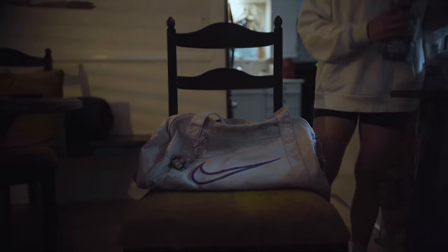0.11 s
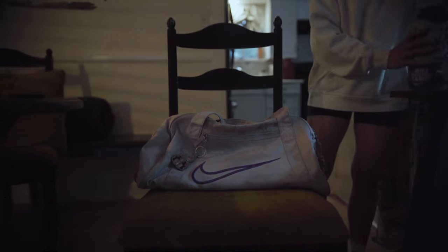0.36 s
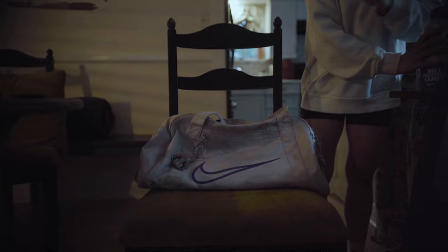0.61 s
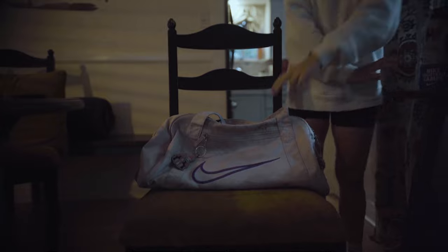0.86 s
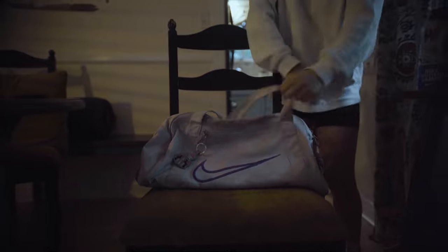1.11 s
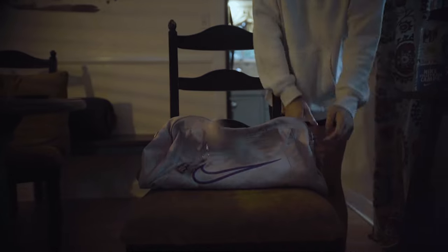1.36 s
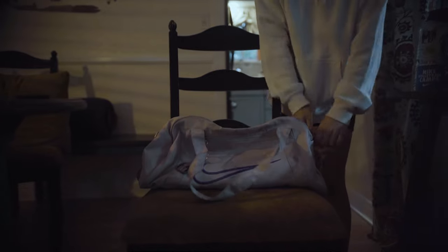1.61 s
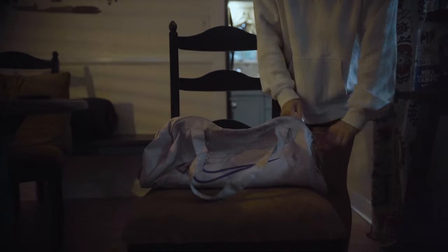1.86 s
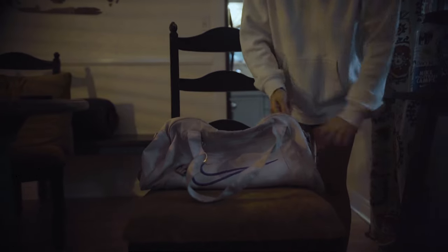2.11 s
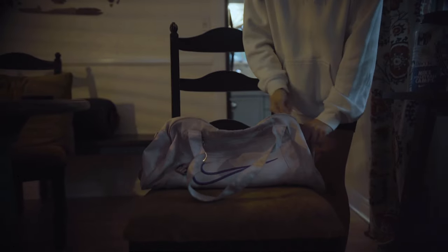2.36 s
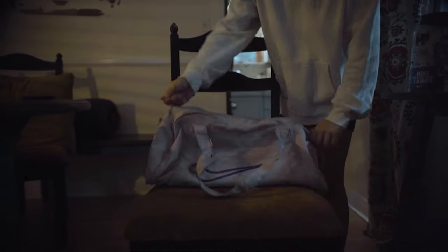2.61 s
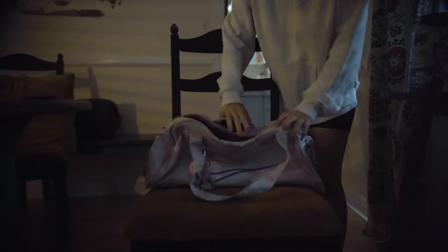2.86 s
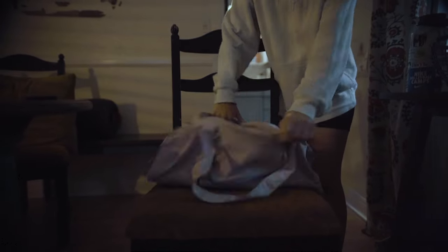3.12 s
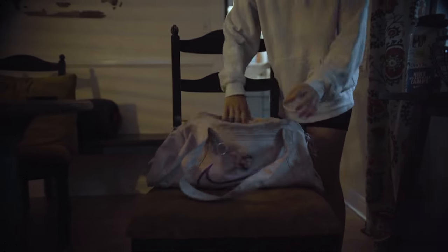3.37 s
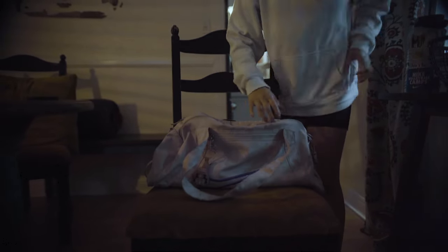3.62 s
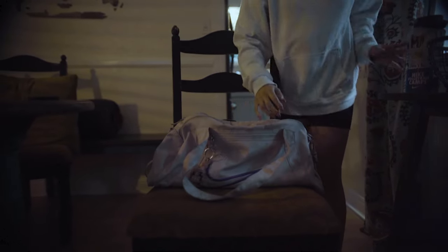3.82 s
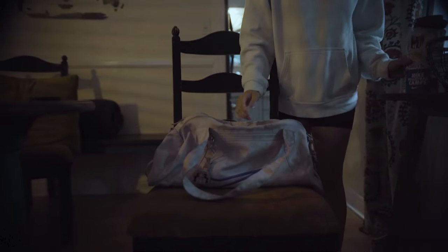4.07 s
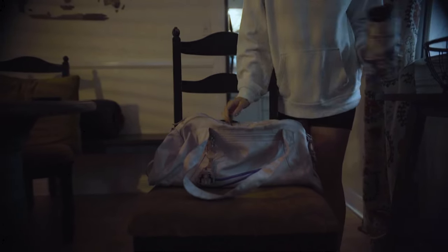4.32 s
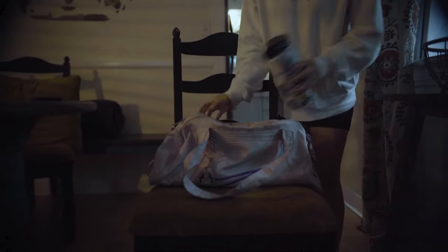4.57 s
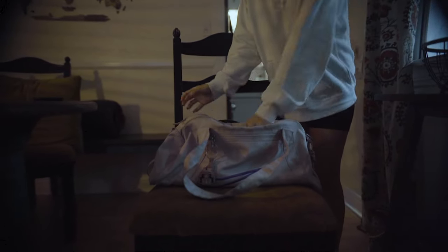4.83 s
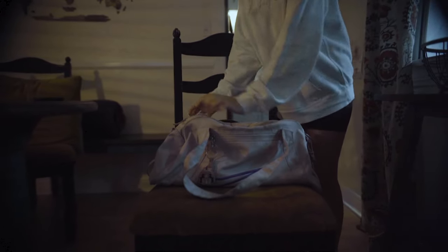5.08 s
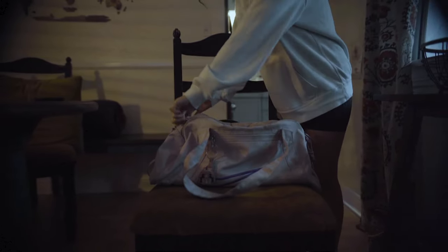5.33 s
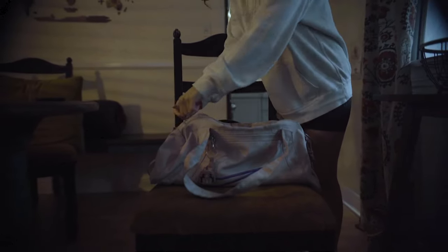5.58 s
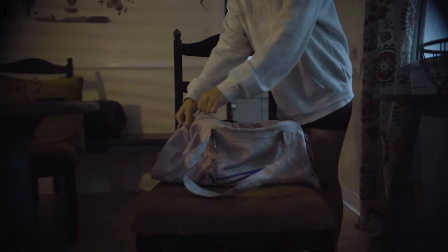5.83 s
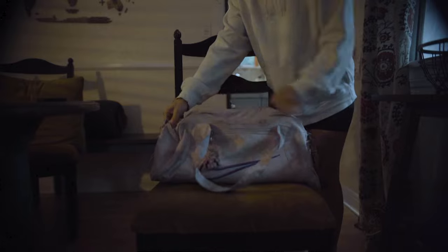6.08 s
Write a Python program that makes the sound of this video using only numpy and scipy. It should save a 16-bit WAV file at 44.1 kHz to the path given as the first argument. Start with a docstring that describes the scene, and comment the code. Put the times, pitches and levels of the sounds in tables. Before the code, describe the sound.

Wood judders and thuds in a quiet room, followed by fabric rustling, a short and a longer zip pull, a hard bump, taps and a final zip.

```python
"""In a quiet living room, a fabric sports bag is handled on a chair: cloth rustles as grainy noise.
Wooden furniture judders as noise-driven modes, bumps ring the chair, and short noise bursts snap and squeak.
A zip makes one short and two long strokes of whining teeth; its pull clinks and a bottle taps as rough bands.
Low thuds are narrow bands of noise beside a wavering low hum, over soft air and a short diffuse reverberation."""
import sys
import numpy as np
from scipy import signal
from scipy.fft import rfft, irfft
from scipy.io import wavfile
from scipy.ndimage import uniform_filter1d

SR = 44100
rng = np.random.default_rng(int(sys.argv[2]) if len(sys.argv) > 2 else 0)


def natural_amplitude(level_db):
    """Convert a level in decibels to a linear amplitude factor, elementwise."""
    exponent = np.asarray(level_db, float) / 20
    return 10 ** exponent


def unload_audio(sound):
    """Save the sound as a 16-bit wav file, at the path given as the first command line argument."""
    columns = np.transpose(np.atleast_2d(sound))
    # keep every value between -1 and 1, then stretch to whole-number steps
    steps = np.round(np.clip(columns, -1, 1) * 32767)
    wavfile.write(sys.argv[1], SR, steps.astype(np.int16))


N = 273420
T = np.arange(N) / SR  # time of every sample [s]

# colour of the still air: (frequency [Hz], relative density [dB per Hz])
AIR_COLOUR = [(15, -38), (27, 10), (40, -7), (55, 4), (80, -5), (102, -6.5), (160, -1.5), (200, -8),
              (246, -3), (313, -14), (457, -11), (997, -10), (3440, -25.5), (7300, -28), (13900, -33.5),
              (15500, -36)]
AIR_DB = -46.5
# left-right likeness of diffuse sound: (frequency [Hz], likeness [0-1])
LIKENESS = [(30, .99), (70, .975), (250, .88), (1000, .4), (3000, .1), (12000, .15)]
# how long the room rings: (frequency [Hz], 60 dB decay [s])
ROOM_T60 = [(60, 0.3), (500, 0.41), (3000, 0.29), (12000, 0.33)]
# centre level of the wavering low hum: (time [s], level [dB])
HUM_LEVEL = [(0, -47.5), (1.0, -64), (3.9, -54), (4.2, -47), (4.9, -46.5), (5.3, -45.5), (5.7, -43.5),
             (6.2, -50.5)]
HUM_HZ = 79.8
# low thuds, weight on the floor and the cabinet's deepest shaking:
# (time [s], lower band level [dB], upper band level [dB])
THUDS = [(0.12, -55, -61), (0.375, -35, -25), (0.43, -41, -21.5), (0.5, -31, -21), (0.598, -27, -20),
         (0.83, -37, -34.5), (1.03, -37, -59), (1.25, -55, -54), (1.55, -51, -51), (1.82, -46.5, -67),
         (2.26, -49, -59), (2.52, -57, -58), (3.07, -40.5, -52), (3.2, -31.5, -52), (3.3, -38, -58),
         (3.42, -45, -44.5), (3.58, -59, -47), (4.04, -40, -42), (4.9, -58, -49), (5.55, -52, -49),
         (4.3, -50, -48), (5.42, -43, -46), (5.85, -39.5, -63), (6.11, -44, -41)]
THUD_RISE_S, LOWER_FALL_S, UPPER_FALL_S = 0.036, 0.3, 0.22  # over 20 dB
# a wooden cabinet jolted as things slide in it:
# (time [s], panel level [dB], frame level [dB], rattle level [dB], buzz level [dB])
JOLTS = [(0.362, -40, -36, -23, -17.5), (0.385, -17, -12.5, -13, -41), (0.43, -32, -16, -18, -24),
         (0.493, -18, -11.5, -22, -29.5), (0.55, -31, -22.5, -24.5, -38), (0.586, -22, -16, -30, -34.5),
         (0.659, -30, -19, -35, -42), (0.62, -30, -13, -24, -31), (0.698, -23.5, -37, -46, -57),
         (0.755, -32, -31, -58, -64), (0.80, -35, -46, -35.5, -46.5), (0.83, -32.5, -32, -43, -47),
         (0.88, -39, -45, -67, -65), (4.26, -39, -41.5, -57, -59), (4.31, -41, -44, -53, -59),
         (1.006, -46, -42, -46.5, -53), (4.018, -31, -39, -44.5, -49), (4.066, -44, -35.5, -52, -50),
         (4.09, -22.5, -35, -57, -49), (4.142, -25, -49, -41, -44), (4.198, -29, -29.5, -39, -38.5)]
# rise and fall of a jolt over 20 dB: (panel [s], frame [s], rattle [s], buzz [s])
JOLT_RISE_S = [0.012, 0.0088, 0.0064, 0.0069]
JOLT_FALL_S = [0.12, 0.13, .13, 0.094]
# modes of the wood: (frequency [Hz], relative level [dB], 60 dB decay [s])
WOOD_MODES = [(147.3, 0, 0.39), (218.7, 0, 0.41), (265.6, -0.5, 0.72), (318, -8.5, 0.23), (427, -1.5, 0.16),
              (518, -2, 0.12), (604, -2, 0.13), (709, -8.5, 0.3), (893, -7, 0.14), (1140, 1.5, 0.2),
              (1325, 3.5, 0.093), (1677, 1, 0.047), (1862, -9, 0.14), (2280, -6.5, 0.11),
              (2260, -14, 0.027)]
# bumps of the bag and its contents on the chair, and the cabinet's first jolt:
# (time [s], peak before panning [dB], hardness [0-1])
KNOCKS = [(0.359, -3, 0.9), (0.792, -47, 0.7), (0.998, -32, 0), (1.194, -29, 0.05), (1.494, -23.5, 1),
          (2.92, -27.5, 0.4), (3.043, -25.5, 1), (3.15, -23, 0.9), (3.19, -5.5, 0.8), (3.199, -9.5, .8),
          (0.57, -19, 0.5), (1.851, -33, 1), (3.223, -17, 1), (3.236, -13.5, 1), (3.591, -26, 0.3),
          (5.385, -38, 1)]
# modes of the chair: (frequency [Hz], relative level [dB], 60 dB decay [s])
CHAIR_MODES = [(247, -12, 0.33), (376, -0.5, 0.17), (453, 2, 0.21), (662, 6.5, 0.066), (821, 0.5, 0.13),
               (1100, -5, 0.045), (1480, -26, .03), (2100, -22, .02), (3000, -27, .015)]
# the metal zip pull clinks: (time [s], level before the mix [dB])
CLINKS = [(1.8057, -45), (3.8808, -25), (4.0884, -46)]
# modes of the zip pull: (frequency [Hz], relative level [dB], 60 dB decay [s])
PULL_MODES = [(1701, -4, .12), (2040, -4, .12), (2650, -1, .08), (4050, -2, .17), (4950, -5, .12),
              (5900, 0, .28), (6450, -8, .1), (8000, -4, .12), (10300, -3, .08), (12230, -8, .1)]
# the bottle is knocked, then taps as it is laid in: (time [s], level before the mix [dB], pitch ratio [1])
BOTTLE_TAPS = [(4.7419, -21.5, 0.99), (4.9352, -30, 0.85), (4.9885, -41, 0.79), (5.08, -45, 0.82),
               (5.036, -35.5, 0.858), (5.129, -37, 0.83), (5.1626, -41, 0.98)]
# modes of the bottle: (frequency [Hz], relative level [dB], 60 dB decay [s])
BOTTLE_MODES = [(1760, 0, .12), (2750, -16, .06), (3500, -16, .05)]
# short noises: cloth and hardware snaps, a squeak, knock cracks, dull judder noise, narrow rings:
# (time [s], rms before fade and pan [dB], centre [Hz], width [octaves], 60 dB fade [s])
SHORT_NOISES = [(0.13, -41, 1860, 0.39, 0.64), (0.132, -35, 3320, 0.56, 0.039),
                (0.146, -35.5, 1100, 0.32, 0.13), (0.231, -39, 3050, 0.16, 0.48),
                (0.358, -43.5, 3500, 1.6, .8), (0.6, -48, 3500, 2.3, 0.44), (0.793, -38, 1250, 0.43, 0.12),
                (0.357, -35, 5000, 1.56, 0.094), (0.640, -44.5, 8700, 0.86, 0.23),
                (1.537, -37.5, 8000, 2.1, .12), (1.682, -48, 7800, 2.6, .13), (1.781, -35, 8000, 5, 0.13),
                (1.806, -34, 6470, .1, 0.19), (1.812, -37, 9300, .25, 0.29),
                (1.950, -41.5, 8500, 0.24, 0.19), (2.109, -44, 9700, 0.16, .068),
                (2.197, -39, 11000, 1.5, 0.15), (2.919, -38.5, 2800, 1.5, 0.078),
                (3.043, -35, 2000, 2.5, 0.056), (3.59, -43, 1200, 1.7, 0.051), (5.841, -50, 1500, 2.5, .05),
                (3.136, -40, 3000, 1.4, 0.16), (3.88, -23.5, 7300, 2, 0.096),
                (4.071, -36, 8400, 0.89, 0.092), (4.087, -32, 9750, 0.89, 0.1),
                (4.17, -39.5, 2330, 0.088, .4), (4.18, -52, 4320, 0.055, 0.28),
                (4.189, -36.5, 1125, 0.1, 0.32), (4.741, -31, 2700, 0.68, 0.43),
                (4.788, -36, 1200, 0.56, 0.28), (4.895, -47, 8900, 1.2, .066),
                (5.397, -44, 3500, 1.1, 0.21), (5.41, -33, 1100, 0.55, 0.18)]
# where the hands are heard: (time [s], left minus right [dB])
HANDS = [(0, -1), (.7, -9), (1.05, -1), (1.5, -1.5), (2.4, -2), (2.7, -1.5), (3.6, -0.5), (3.9, -2.5),
         (4.3, -1.5), (4.9, -1), (5.5, 0), (6.2, -3)]
# hand movements on the cloth, rise and fall over 20 dB:
# (peak time [s], swish level [dB], padding level [dB], rise [s], fall [s])
RUSTLES = [(0.06, -42.5, -46, 0.073, 0.19), (0.13, -59, -48, 0.053, .15), (0.25, -51.5, -50, 0.075, 0.63),
           (1.05, -45, -53, 0.081, 0.14), (1.22, -39.5, -45, 0.27, 0.25), (1.40, -47, -48, 0.3, 0.047),
           (1.50, -50, -41.5, 0.012, .17), (1.55, -43, -49, 0.03, 0.12), (1.71, -43, -49, 0.036, 0.11),
           (1.81, -33.5, -46.5, 0.044, 0.16), (1.95, -49, -44.5, 0.26, 0.67), (2.07, -55, -49, 0.36, 0.063),
           (2.2, -44, -46, 0.13, 0.27), (2.42, -50, -38.5, 0.096, 0.38), (2.65, -36.5, -32, 0.15, 0.12),
           (2.74, -35, -34.5, 0.14, 0.27), (2.925, -60, -37, 0.2, 0.16), (3.151, -37.5, -28.5, 0.1, 0.13),
           (3.194, -36.5, -26.5, 0.13, .2), (3.3, -35, -35.5, 0.6, 0.35), (3.045, -44, -41, 0.022, .1),
           (3.42, -53, -44.5, .15, 0.18), (1.12, -57, -57, .1, .2), (3.6, -69, -44, 0.043, 0.28),
           (3.883, -38.5, -47.5, 0.0075, 0.19), (4.09, -44, -54, .06, 0.13),
           (4.2, -48.5, -39.5, 0.18, 0.082), (4.48, -64, -50.5, 0.15, 0.37),
           (4.749, -43, -44.5, 0.043, 0.14), (4.91, -45.5, -42.5, 0.26, 0.2),
           (5.055, -62, -48, 0.062, 0.12), (5.15, -65, -57, .06, 0.25), (5.401, -47.5, -34, 0.016, 0.12),
           (5.87, -50, -40, 0.09, 0.9)]
SHEEN_DB, SEAT_DB, REST_DB = -9, -4, -69.5  # sheen re swish, seat re padding, the cloth at rest
BRIGHTER_DB_PER_DB = 0.1  # extra sheen per dB of swish over padding
# zip strokes, each a list of:
# (time [s], mean tooth rate [Hz], whine level before the mix [dB], scrape level before the mix [dB])
ZIP_STROKES = [
    [(2.302, 602, -57, -70), (2.31, 630, -41.5, -55), (2.33, 539, -31.5, -56), (2.345, 573, -73, -66)],
    [(2.42, 565.4, -28, -46), (2.44, 697, -32, -38.5), (2.47, 984, -29.5, -31.5), (2.504, 1365, -20, -29),
     (2.546, 1577, -27.5, -27.5), (2.58, 1628, -21, -34.5), (2.605, 1420, -27.5, -31.5),
     (2.625, 1147, -27, -39), (2.65, 1223, -31.5, -67), (2.68, 1200, -45, -50)],
    [(5.84, 168.2, -60, -62), (5.88, 282.6, -43, -50), (5.92, 430.7, -28, -40.5), (5.97, 551.9, -25, -34.5),
     (6.0, 727, -28.5, -35), (6.035, 751.8, -19.5, -28.5), (6.065, 804, -24, -29.5), (6.09, 893, -18, -30),
     (6.12, 941, -20, -29), (6.152, 980, -23, -31.5), (6.2, 1037, -23.5, -27)],
]
# high-band brightness of the scrape, one value a stroke: (relative level [dB])
ZIP_SHEEN_DB = [-3.5, -4, -14]
# second partial of the zip, strongest where the slider rings: (frequency [Hz], level re the whine [dB])
ZIP_OCTAVE = [(350, 6), (1150, -7), (1900, 1.5), (2800, -13), (3300, -5.5)]


def spectrum(rows, hz):
    """Read a spectrum on a log-frequency axis."""
    f, v = np.transpose(rows)
    return np.interp(np.log(np.maximum(hz, 1)), np.log(f), v)


def curve(rows):
    """Draw a timed table as a line through every sample."""
    s, v = np.transpose(rows)
    return np.interp(T, s, v)


def unit(x):
    """Scale to rms 1."""
    return x / np.sqrt(np.mean(x ** 2))


def decay(t, t60):
    """Exponential fade that loses 60 dB in t60 seconds."""
    return np.exp(-np.log(1000) * t / t60)


def band(x, lo_hz, hi_hz, order=2):
    """Band-pass."""
    edges = [lo_hz, min(hi_hz, .45 * SR)]
    return signal.sosfilt(signal.butter(order, edges, "bandpass", fs=SR, output="sos"), x)


def diffuse(n, grain=1):
    """Two-channel noise, alike in the bass and mostly unrelated in the treble."""
    likeness = np.clip(spectrum(LIKENESS, np.arange(n // 2 + 1) * SR / n), 0, 1)
    raw = rng.standard_normal((2, n)) * grain
    mid, side = irfft(rfft(raw) * np.sqrt([1 + likeness, 1 - likeness]), n)
    return np.array([mid + side, mid - side]) / 2 ** .5


def walk(rate):
    """Random levels held 1 / rate s and slewed twice; spread near 1."""
    hold = int(SR / rate)
    steps = np.repeat(rng.standard_normal(N // hold + 1), hold)
    return 1.4 * uniform_filter1d(uniform_filter1d(steps, hold), hold)[:N]


def swells(s, db, rise, fall):
    """Level of a row of events that rise to a peak and fall away, summed in power."""
    s, db, rise, fall = (np.reshape(v, (-1, 1)) for v in (s, db, rise, fall))
    coarse = T[::64]
    t = coarse - s
    drop = np.where(t < 0, -t / np.maximum(rise, .002), t / np.maximum(fall, .002))
    power = np.sum(natural_amplitude(2 * (db - 20 * np.minimum(drop, 10))), axis=0)
    return np.interp(T, coarse, np.sqrt(power))


def steady(x, window_s=0.066, share=0.79):
    """Even out the slow chance swells of a narrow band: a driven resonance holds its level."""
    power = uniform_filter1d(np.mean(x ** 2, axis=0), size=int(window_s * SR))
    return unit(x / (np.maximum(power, 0) + .01 * np.mean(power)) ** (share / 2))


def pan(db):
    """Gains of left and right for a left-minus-right level."""
    return natural_amplitude(np.array([db / 2, -db / 2]))


def from_right(x):
    """Sound from the right reaches the left channel four samples late."""
    return np.array([np.roll(x[0], shift=4), x[1]])


def add(out, s, sound):
    """Mix a short sound in at time s."""
    i = int(s * SR)
    out[..., i:i + sound.shape[-1]] += sound[..., :N - i]


def hush():
    """The steady air of the house: diffuse noise in a fixed colour."""
    x = rfft(diffuse(N)) * natural_amplitude(spectrum(AIR_COLOUR, np.arange(N // 2 + 1) * SR / N))
    return unit(irfft(x, N)) * natural_amplitude(AIR_DB)


def reverb(x):
    """Diffuse tail, each octave dying at its own rate."""
    t, noise = T[:SR], diffuse(SR)
    tail = 0
    for hz in 40 * 2. ** np.arange(9):
        tail = tail + band(noise, hz / 2 ** .5, hz * 2 ** .5) * decay(t, spectrum(ROOM_T60, hz))
    tail = tail * np.clip((t - .003) / 0.0061, 0, 1)  # starts after 3 ms, full 6.1 ms later
    return signal.fftconvolve(x, tail / np.sqrt(np.sum(tail ** 2) / 2), axes=1)[:, :N]


def hum():
    """A low sine whose level and pitch waver."""
    level = natural_amplitude(curve(HUM_LEVEL) + 3.0 * walk(13))
    cycles = np.cumsum(HUM_HZ * (1 + .04 * walk(12))) / SR
    return 2 ** .5 * level * np.sin(2 * np.pi * cycles)


def thuds():
    """Low thuds, weight on the floor and the cabinet's deepest shaking: two narrow bands of noise."""
    s, lower_db, upper_db = np.transpose(THUDS)
    lower = swells(s, lower_db, THUD_RISE_S, LOWER_FALL_S)
    upper = swells(s, upper_db, THUD_RISE_S, UPPER_FALL_S)
    return steady(band(diffuse(N), 54.0, 63.3)) * lower + steady(band(diffuse(N), 71.0, 100.5)) * upper


def judder():
    """Stick-slip: dense, unevenly grained noise shakes each group of the wood's modes."""
    out = 0
    s, *levels = np.transpose(JOLTS)
    slips = diffuse(N, natural_amplitude(2.03 * rng.exponential(size=N)))
    # panel, frame, rattle, buzz [Hz]
    ranges = [(120, 190), (190, 350), (350, 1000), (1000, 3000)]
    for (lo, hi), db, rise, fall in zip(ranges, levels, JOLT_RISE_S, JOLT_FALL_S):
        body = 0
        for hz, gain_db, t60 in WOOD_MODES:
            if lo < hz < hi:
                reach = 3 / t60 + hz ** 2 / 3e4  # half the bandwidth [Hz]
                body = body + natural_amplitude(gain_db) * unit(band(slips, hz - reach, hz + reach))
        out = out + steady(body) * swells(s, db, rise, fall)
    return out


def ring(modes, scatter_db, split, dull_hz):
    """One blow on a set of modes, each a close cluster that beats; a soft blow misses the high modes."""
    hz, db, t60 = np.repeat(np.transpose(modes), 3, axis=1)[..., None]  # three partials a mode
    t, chance = T[:SR // 2], rng.standard_normal((2, len(hz), 1))
    gain = natural_amplitude(db + scatter_db * chance[0]) / (1 + (hz / dull_hz) ** 2)
    partials = gain * np.sin(2 * np.pi * hz * (1 + split * chance[1]) * t) * decay(t, t60)
    y = np.sum(partials, axis=0)
    return -y / np.max(np.abs(y))


def knocks():
    """Single bumps: short pushes on the padded chair, harder ones brighter."""
    out = np.zeros(N)
    for s, db, hard in KNOCKS:
        dull_hz = 3000 * max(hard, .03) ** 2 + 80
        add(out, s, natural_amplitude(db) * ring(CHAIR_MODES, 0.87, split=0.053, dull_hz=dull_hz))
    return out


def chatter(modes, spread, ratio=1):
    """A loose part struck once keeps chattering, so each mode rings as a narrow, rough band."""
    t = T[:SR // 2]
    noise = rng.standard_normal(len(t))
    y = 0
    for hz, db, t60 in modes:
        rough = band(noise, hz * ratio * (1 - spread), hz * ratio * (1 + spread))
        y = y + natural_amplitude(db) * unit(rough) * decay(t, t60)
    return y / np.sqrt(np.mean(y[:SR // 100] ** 2)) / 2  # first 10 ms at rms 0.5


def hardware():
    """Zip pull clinks and hollow bottle taps, each a fading set of rough bands."""
    out = np.zeros(N)
    for s, db in CLINKS:
        add(out, s, natural_amplitude(db) * chatter(PULL_MODES, .025))
    for s, db, ratio in BOTTLE_TAPS:
        add(out, s, natural_amplitude(db) * chatter(BOTTLE_MODES, .07, ratio))
    return out


def short_noises():
    """Sudden wide or narrow bursts of noise, each with its own fade."""
    out, t = np.zeros((2, N)), T[:SR // 3]
    for s, db, hz, octaves, fade in SHORT_NOISES:
        reach = 2 ** (octaves / 2)
        burst = unit(band(diffuse(len(t)), hz / reach, hz * reach))
        add(out, s, natural_amplitude(db) * burst * decay(t, fade))
    return out * pan(curve(HANDS))


def cloth():
    """Countless fibre slips: grainy noise whose treble, sheen and body follow the hands."""
    s, swish_db, padding_db, rise, fall = np.transpose(RUSTLES)
    light = swells(s, swish_db, rise, fall) + natural_amplitude(REST_DB)
    heavy = swells(s, padding_db, rise, fall) + natural_amplitude(REST_DB)
    grain = natural_amplitude(2.5 * np.minimum(rng.exponential(size=N), 7) + 1.6 * walk(120))
    slips = diffuse(N, grain)
    # light strokes, with more swish than padding, have more sheen
    sheen_db = swish_db + SHEEN_DB + BRIGHTER_DB_PER_DB * (swish_db - padding_db)
    sheen = unit(band(slips, 6700, 17200)) * (swells(s, sheen_db, rise, fall) + natural_amplitude(REST_DB - 14))
    swish = unit(band(slips, 1410, 9730))
    padding = unit(band(diffuse(N, natural_amplitude(3.37 * walk(40) + 1.7 * walk(150))), 336, 1740))
    seat = steady(band(diffuse(N), 134, 389)) * natural_amplitude(SEAT_DB)
    return pan(curve(HANDS)) * (light * swish + sheen + heavy * padding) + heavy * seat


def zip_stroke(rows, sheen_db):
    """The slider clicks over the teeth, fast enough to whine; no two teeth alike, and each scrapes."""
    s, rate, whine_db, scrape_db = np.transpose(rows)
    t = T[int(s[0] * SR):int(s[-1] * SR)]
    count = np.arange(2000)
    spacing, strength, speed = rng.standard_normal((2000, 3)).T
    hz = np.interp(t, s, rate)
    # the hand's speed wavers a little
    waver = 1 + .028 * np.interp((t - s[0]) * 90, count, speed)
    even = np.cumsum(hz * waver) / SR  # teeth passed, if evenly spaced
    phase = 2 * np.pi * (even + np.interp(even, count, .035 * np.cumsum(spacing)))
    size = natural_amplitude(4.5 * np.interp(even / 3, count, strength))
    first = natural_amplitude(np.interp(t, s, whine_db))
    scrape = natural_amplitude(np.interp(t, s, scrape_db))
    second = first * natural_amplitude(spectrum(ZIP_OCTAVE, 2 * hz))
    # partials three to seven
    tops = sum(natural_amplitude(-3 - .8 * k) * np.sin((k + 3) * phase + k * k) for k in range(5))
    whine = first * np.sin(phase) + second * np.sin(2 * phase) + scrape * tops
    grit = diffuse(len(t), np.exp(1.8 * np.cos(phase)))  # noise pulsing at each tooth
    hiss = unit(band(grit, 1470, 8460))
    hiss = hiss + natural_amplitude(sheen_db) * unit(band(grit, 5600, 13500))
    hiss = hiss + natural_amplitude(3.5) * unit(band(grit, 330, 2200, order=1))
    hiss = hiss + natural_amplitude(-7.0) * unit(band(grit, 187, 435))  # the whole bag trembles
    edge = np.clip(np.minimum(t - s[0], s[-1] + .004 - t) / .006, 0, 1)
    return s[0], edge * (2 ** .5 * size * whine + scrape * hiss)


def zip_strokes():
    """All strokes of the slider along the teeth, set a little to the right."""
    out = np.zeros((2, N))
    for rows, sheen_db in zip(ZIP_STROKES, ZIP_SHEEN_DB):
        add(out, *zip_stroke(rows, sheen_db))
    return out * pan(-0.6)[:, None]


def scene():
    """Knocks, hardware, bursts, zip and judder ring the room; cloth, thuds, hum and air stay dry."""
    zips = zip_strokes()
    wood = knocks() * pan(-0.73)[:, None]
    metal = hardware() * pan(-0.67)[:, None]
    bursts, shake = short_noises(), judder()
    send = natural_amplitude(-5.0) * wood + natural_amplitude(0.0) * metal + natural_amplitude(-13.5) * bursts + natural_amplitude(-6.5) * zips + natural_amplitude(-11.5) * shake
    wet = reverb(send)
    late_left = wood + natural_amplitude(-4.5) * metal + bursts + shake + cloth() + thuds() + hum() + hush()
    return from_right(late_left) + natural_amplitude(-7.0) * zips + wet


def top_cut(x):
    """A steep low-pass at 16.35 kHz."""
    return signal.sosfilt(signal.butter(12, 16350, fs=SR, output="sos"), x)


def record(dry):
    """The loudest peaks are rounded and the top is cut above 15 kHz."""
    rounded = .75 * np.tanh(dry / .75)
    low_pass = signal.ellip(8, .2, 70, 15000, fs=SR, output="sos")
    mix = signal.sosfilt(low_pass, rounded)
    return top_cut(mix)


dry = scene()
out = record(dry)
unload_audio(out)
```